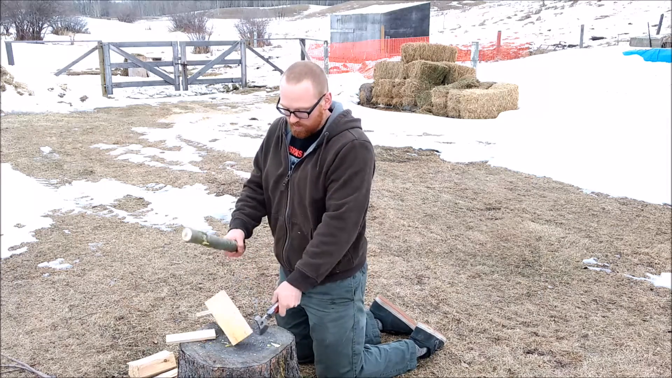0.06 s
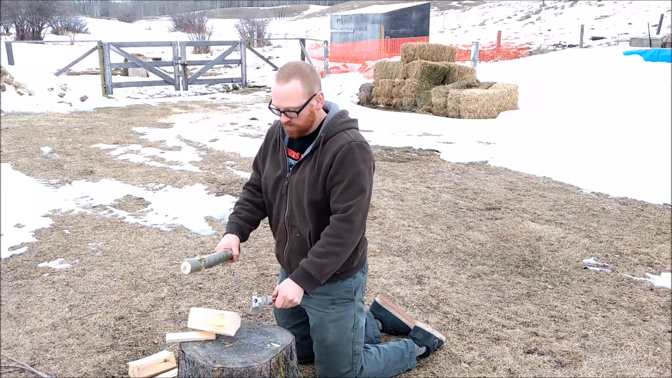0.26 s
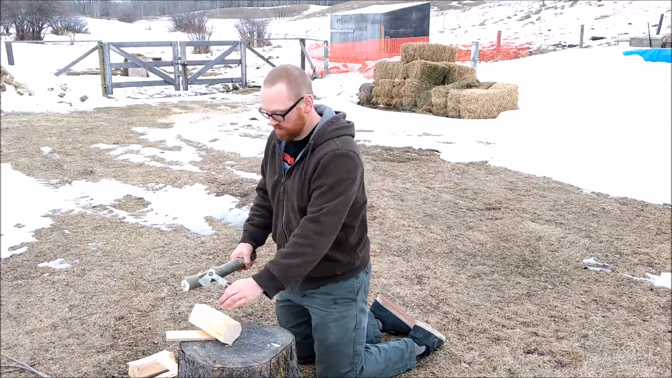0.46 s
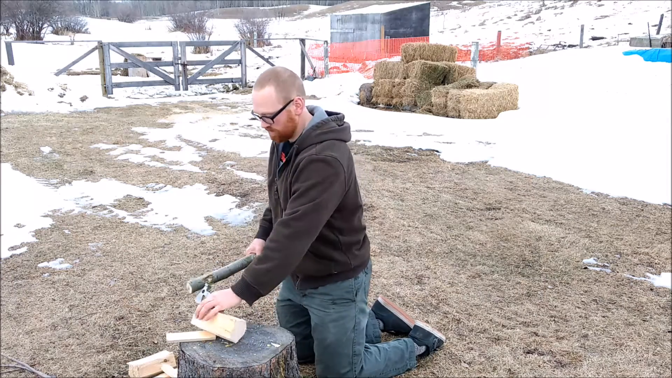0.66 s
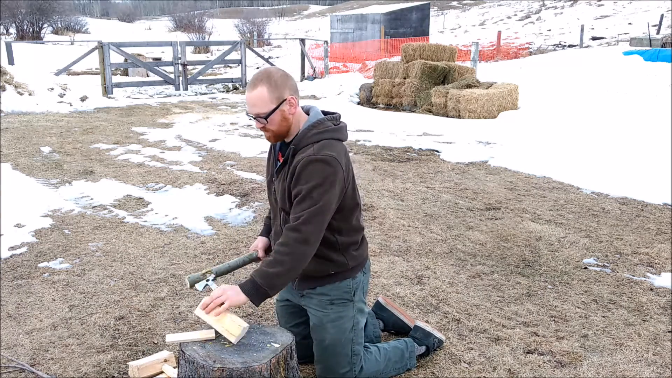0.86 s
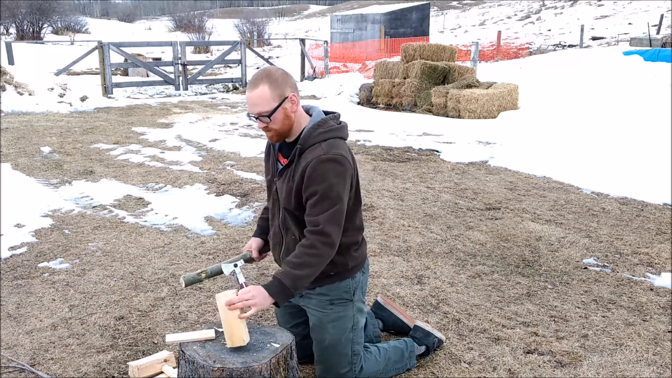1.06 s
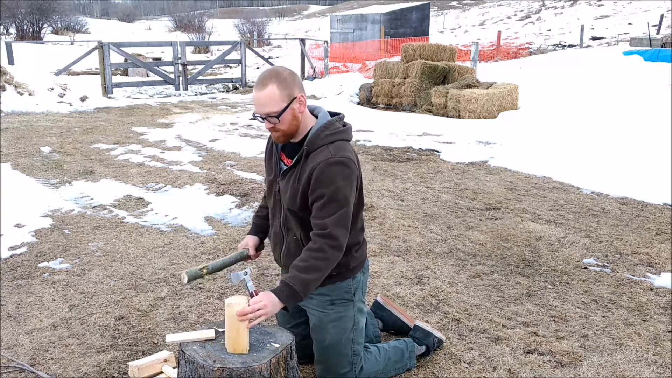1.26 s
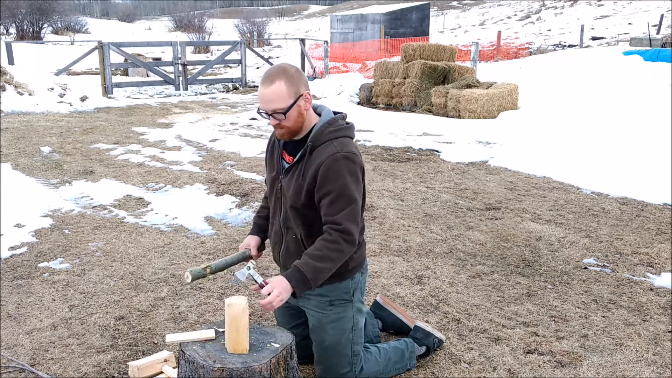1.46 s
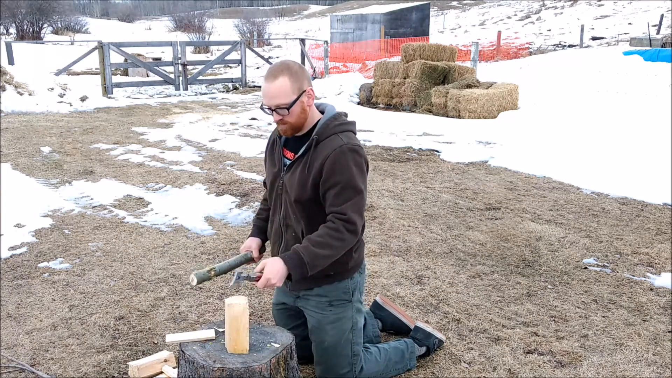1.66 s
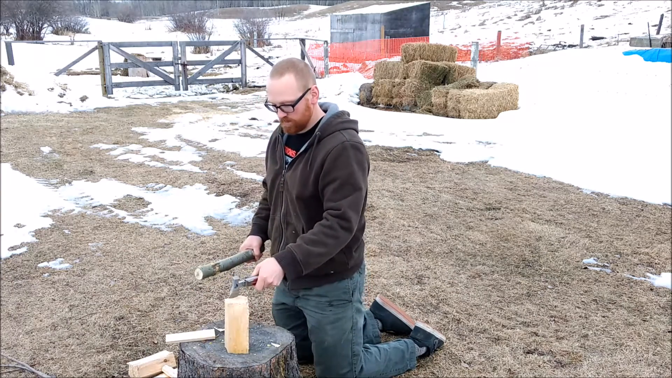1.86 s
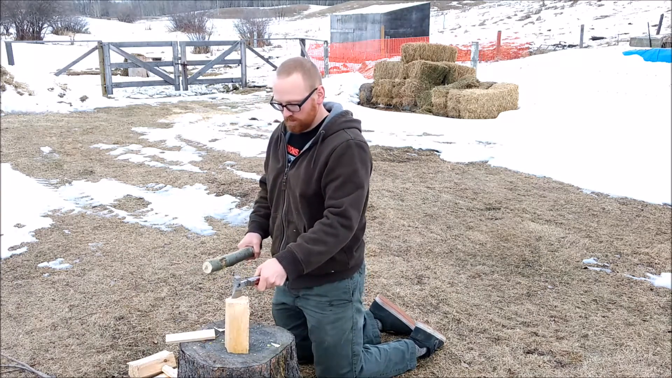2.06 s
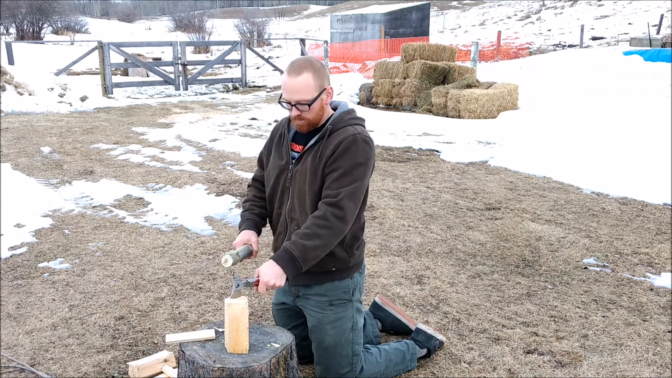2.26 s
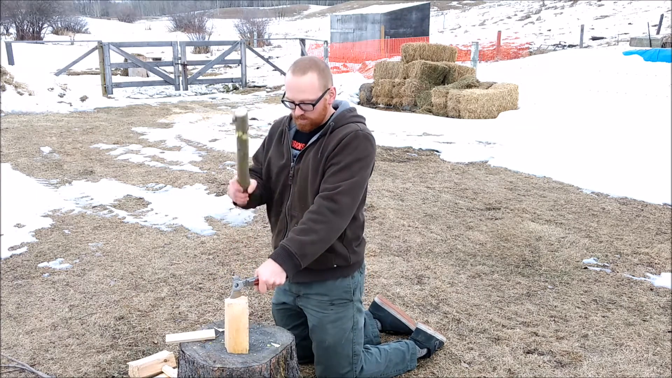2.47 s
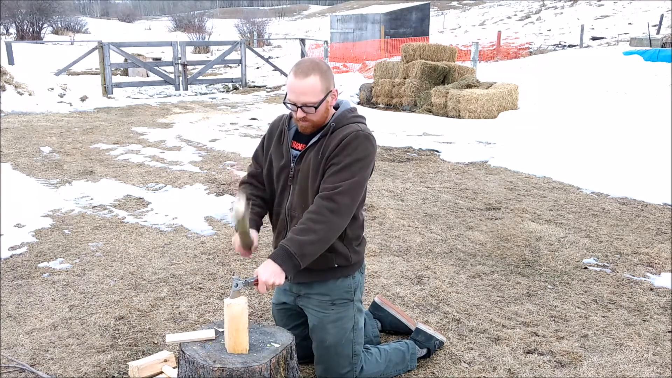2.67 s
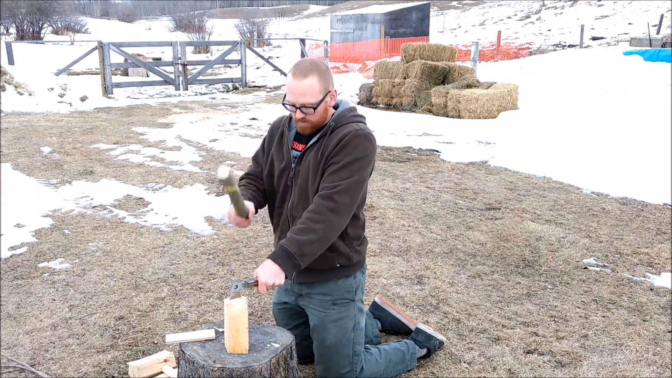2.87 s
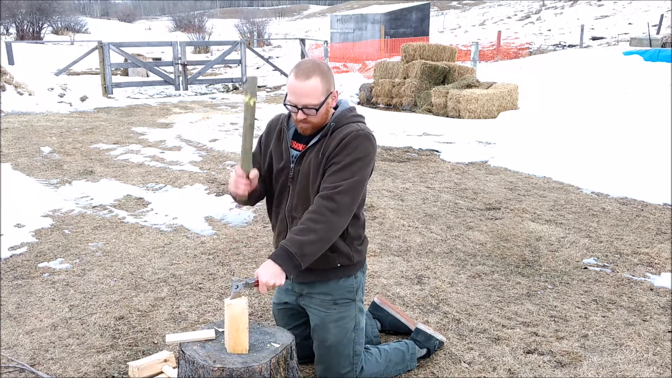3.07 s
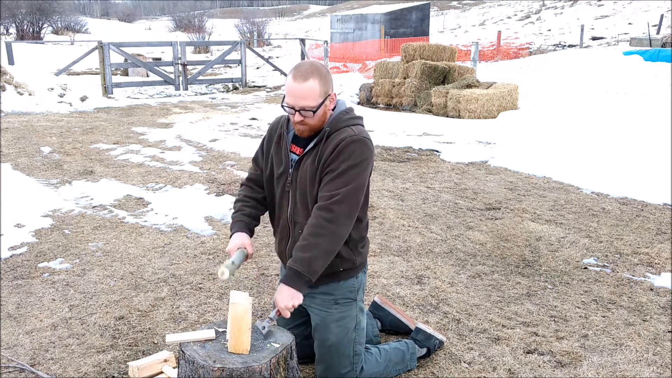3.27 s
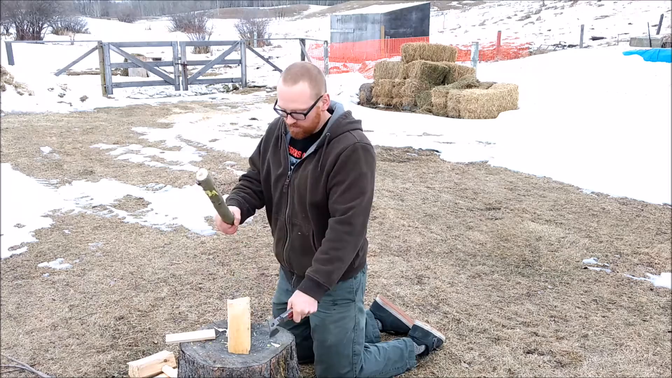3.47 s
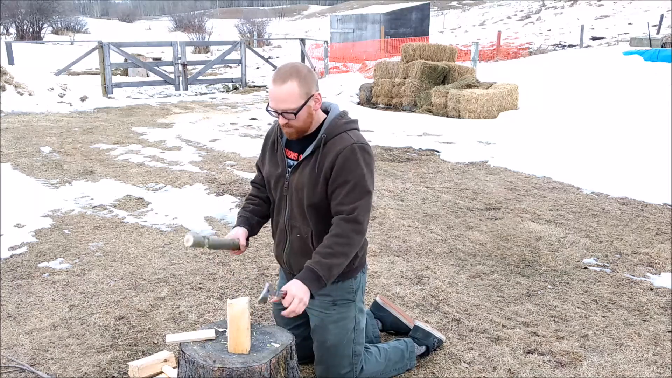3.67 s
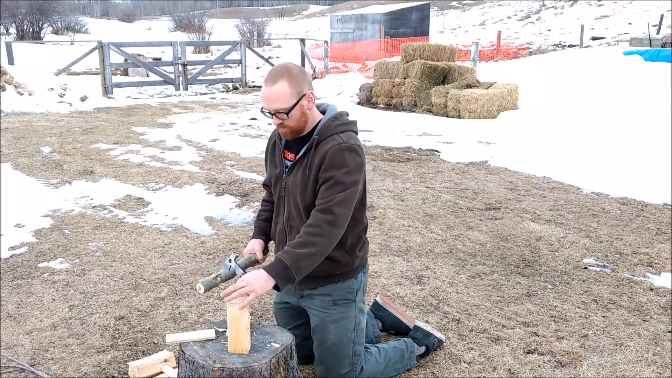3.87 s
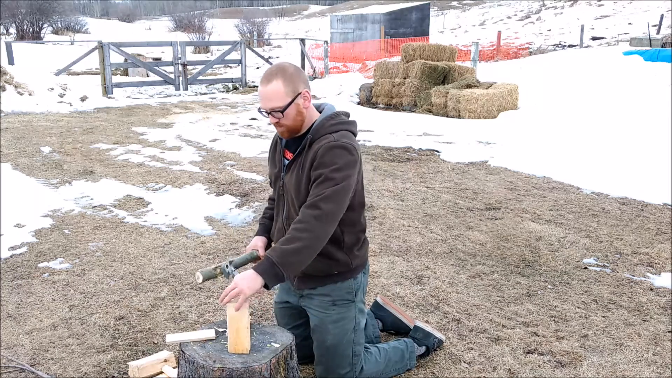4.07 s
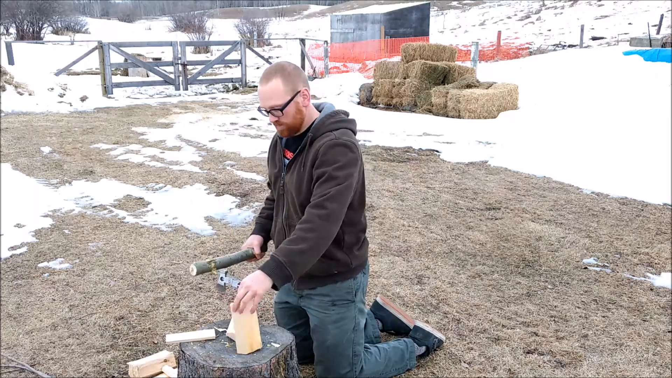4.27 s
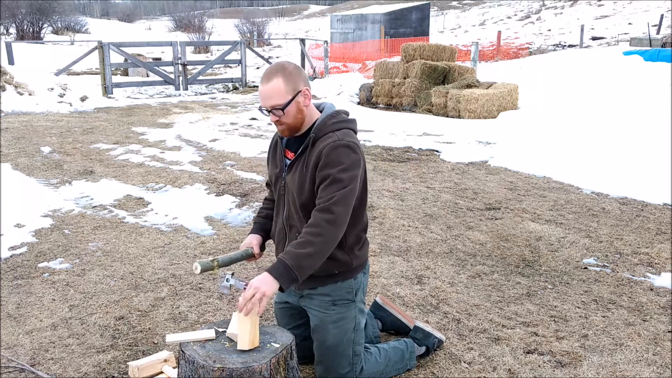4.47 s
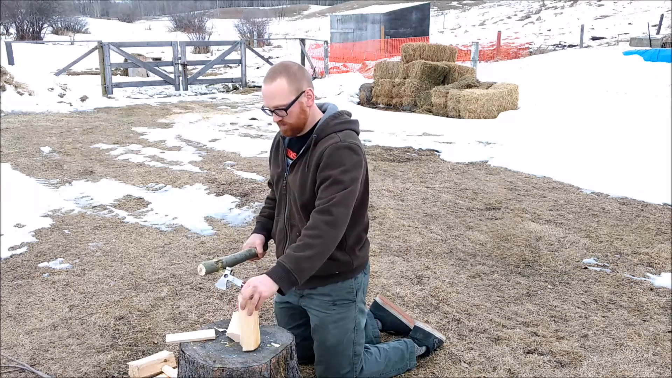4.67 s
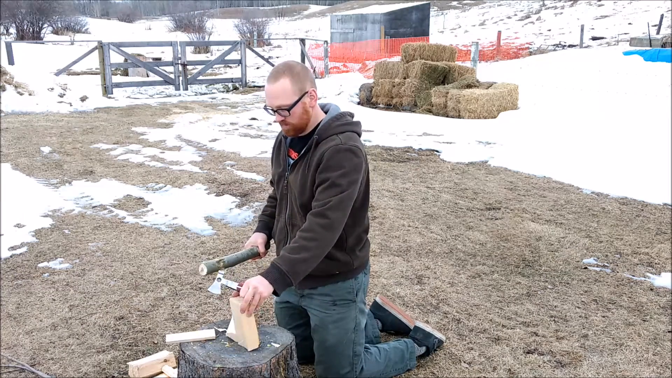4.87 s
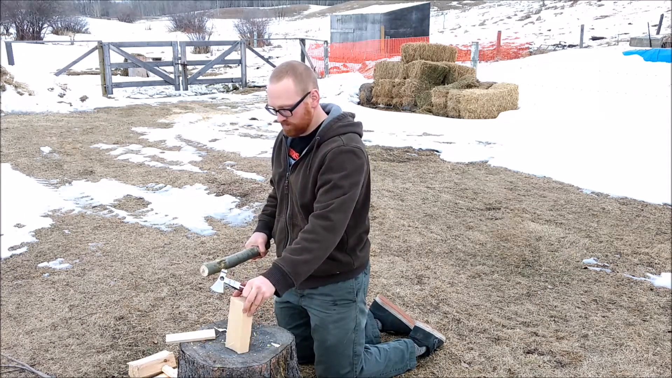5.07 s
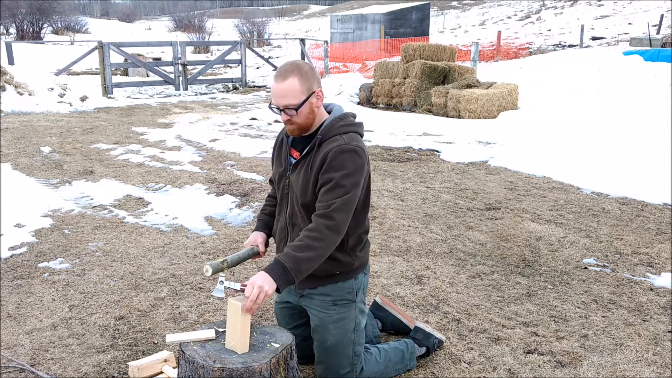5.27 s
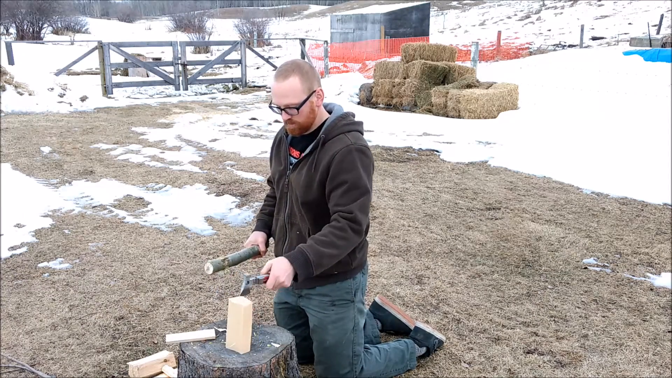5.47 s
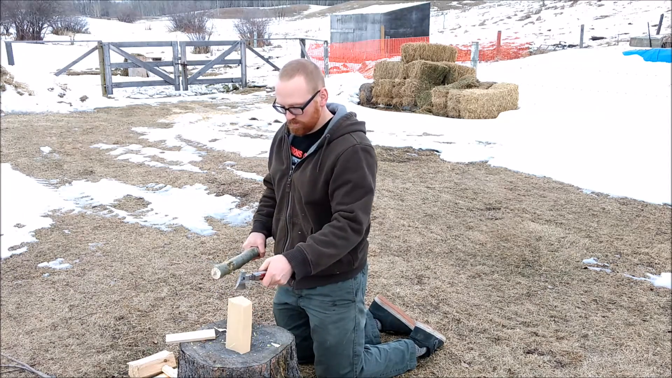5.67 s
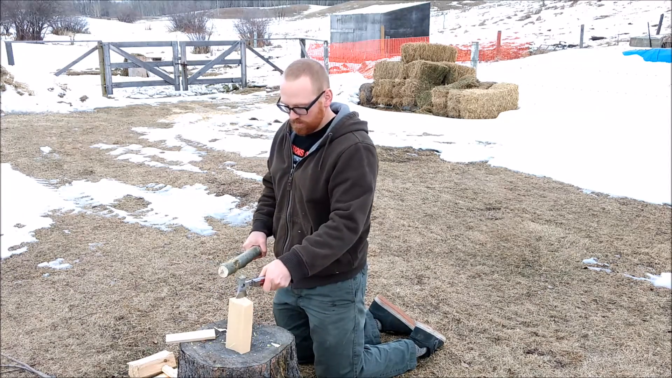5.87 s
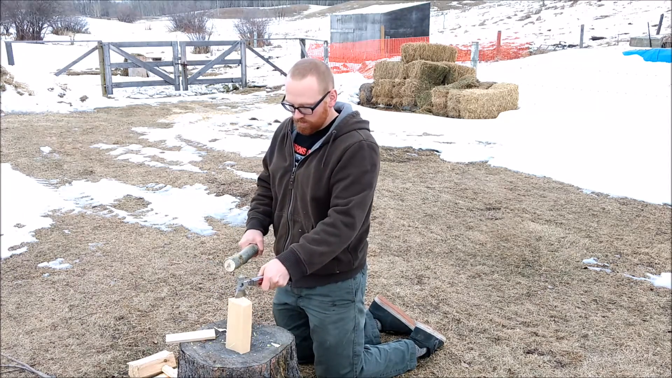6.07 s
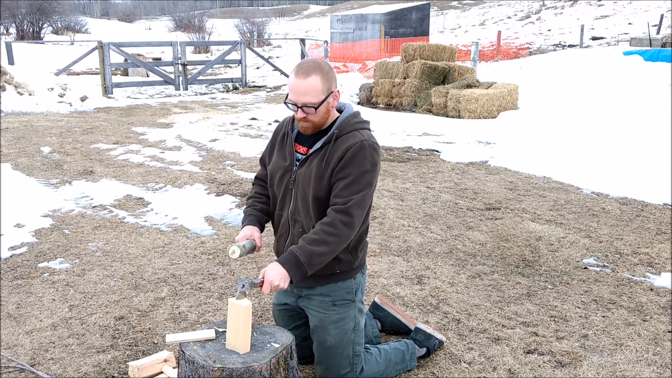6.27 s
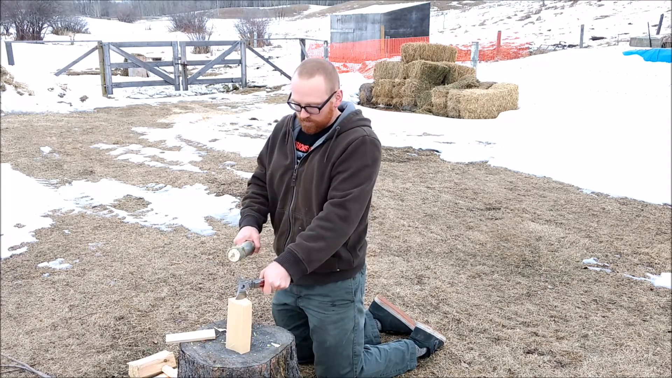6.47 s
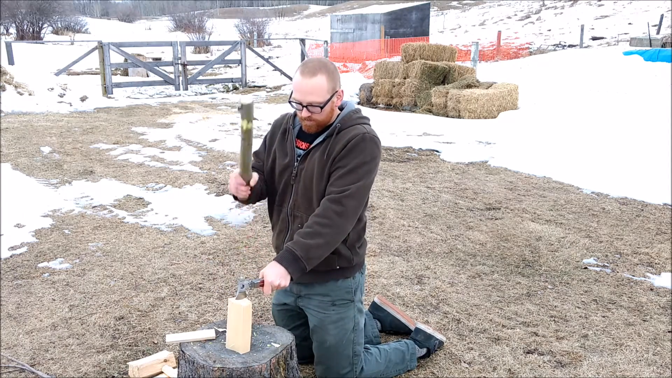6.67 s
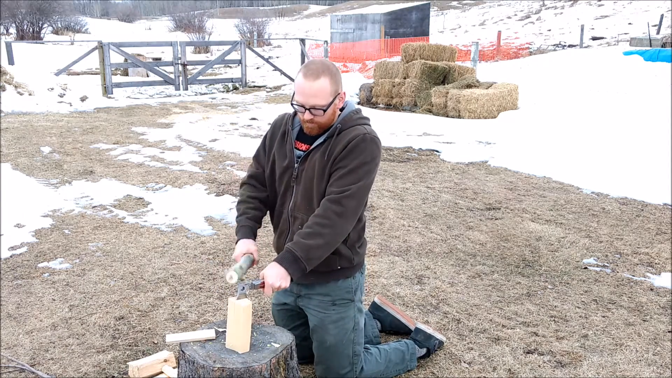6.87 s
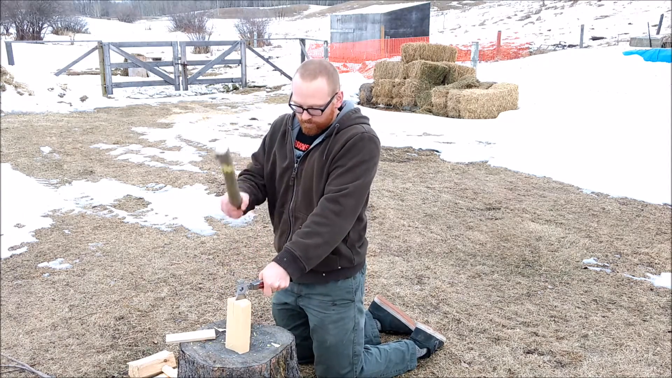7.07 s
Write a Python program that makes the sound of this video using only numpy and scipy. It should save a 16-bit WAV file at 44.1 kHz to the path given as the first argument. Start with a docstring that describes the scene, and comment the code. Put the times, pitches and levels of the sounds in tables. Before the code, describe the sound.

Close, dry wood splitting in open air: pieces are handled with small knocks and a brief metallic ring, then a stick hits a hatchet twice, hard and sharp, and the split halves clatter down. Quiet dull thuds into the stump and grainy rubbing follow before one more blunt whack at the end. Faint traffic and fine hiss lie beneath, ducked after each impact by automatic gain.

```python
"""An open, snowy farmyard: a wooden baton drives a small hatchet through firewood on a stump.
Three hard blows, the second splitting the log, are cracks of noise followed by damped resonances of wood and stump.
Around them wood and blade are set down with resonant knocks, ringing clinks, snapping fibres and grainy rustles.
Distant traffic, made of filtered noise, swells and ebbs; the camera's gain control ducks it after each blow."""
import sys
import numpy as np
from scipy import signal
from scipy.fft import rfft, irfft
from scipy.io import wavfile
from scipy.ndimage import uniform_filter1d

SR = 44100
rng = np.random.default_rng(int(sys.argv[2]) if len(sys.argv) > 2 else 0)


def materialize(psi):
    """Save the field psi as 16-bit PCM at rate SR to the path in sys.argv[1].

    A 1-D psi becomes a single channel; in a 2-D psi each row is a channel.
    """
    bounded = np.clip(np.atleast_2d(psi).T, -1, 1)
    quanta = np.round(bounded * 32767).astype(np.int16)
    wavfile.write(sys.argv[1], SR, quanta)


N = 313992
TAPS = 8192  # samples in one short sound

# The baton hits the back of the blade. Each row: time in seconds, level in dB, softness corner in Hz before the
# log's pitch factor, pitch of the struck piece in Hz, then dB relative to the log: that piece, the crack;
# and last the second push in dB relative to the first.
BLOWS = [(2.7351, 21, 1700, 1575, 7.5, -21.5, -7), (3.1876, 28, 3800, 1572, 1.5, -15, -21),
         (6.9078, 19, 2700, 1236, 7.5, -15.5, -35.5)]
BLOW_THUMP_DB, SECOND_PUSH_S = -8, 0.00146
# Resonances of the log with the blade in it. Each row: frequency in Hz and width in Hz, both before
# the log's pitch factor, level in dB before softening.
LOG_MODES = [(483, 150, -8), (632, 290, -7), (846, 84, -1), (1050, 690, -7), (2250, 380, -1.5),
             (2730, 73, -7.5), (2970, 40, -38.5), (3230, 100, -6.5), (4370, 67, -28), (6180, 180, -1)]
THUMP_HZ, THUMP_WIDTH_HZ, PIECE_WIDTH_HZ = 226, 86, 334
# Spectrum of snapping fibres. Each row: frequency in Hz, gain in dB.
CRACK_SPECTRUM = [(100, -42.5), (300, 0), (1000, 6), (2200, -2), (3200, -4), (4300, -3.5), (5300, -7.5),
                  (6200, 0), (7300, -9.5), (9500, -12.5), (12000, -11.5), (15500, -13.5)]
CRACK_LEAD_S, CRACK_T60_S, LIGHT_CRACK_T60_S = 0.001214, 0.026, 0.074
# Wood falls against wood or steel. Each row: time in seconds, level in dB, log pitch factor, softness corner in Hz
# before that factor, pitch of the struck piece in Hz, level of that piece in dB relative to the log.
CLATTER = [(0.2570, -12, 1, 3020, 1410, -1), (0.2621, -2.5, 1, 2500, 1560, -1),
           (0.3574, -4, 1, 1400, 595, -6), (0.5482, 5, 1.31, 1830, 760, 0),
           (0.5703, -6, 0.79, 2500, 1220, -13), (0.5772, -6.5, 1.14, 2000, 900, -21),
           (3.2071, 12, 1.1, 1700, 1330, -6.5), (3.2147, 19.5, 0.92, 2700, 1453, 14),
           (3.226, 12, 1, 1280, 810, -32)]
CLATTER_THUMP_DB, CLATTER_CRACK_DB = -34.5, -23
# Log and blade are set in place on the stump. Each row: time in seconds, level in dB, pitch of the struck piece in Hz,
# then dB relative to the log: that piece, the stump's thump.
PLACINGS = [(1.8125, -14.5, 645, -17, 4), (5.1117, -8.5, 570, 9, -2), (5.8379, 0, 1390, 4, 1.5),
            (6.0873, -17.5, 800, 5, -7), (6.2531, -8, 826, 7.5, 4)]
PLACING_SOFT_HZ, PLACING_CRACK_DB = 1010, -25
# A splinter snaps. Each row: time in seconds, level in dB before colouring.
SPLINTERS = [(3.575, -12.5), (4.533, -18)]
SPLINTER_T60_S = 0.03  # before colouring
# Colour of a splinter. Each row: frequency in Hz, gain in dB.
SPLINTER_SPECTRUM = [(150, -20.5), (1000, 5), (2600, -4.5), (4200, 1), (6000, -3.5), (9000, -10),
                     (15000, -7)]
# A loose billet lands or is nudged. Each row: time in seconds, level in dB, softness corner in Hz,
# level in dB of the crunch of its rough end.
DROPS = [(0.018, 16.5, 980, -6.5), (3.3252, 7.5, 1500, -17.5), (3.406, 26, 2900, -9.5),
         (3.5362, 8, 890, -34.5), (3.5925, 3.5, 1000, -29)]
# The loose billet rings longer than the held log. Each row: frequency in Hz, width in Hz, level in dB before softening.
BILLET_MODES = [(175, 31, -24.5), (654, 133, -7), (848, 75, 2.5), (1216, 260, -18.5), (1580, 380, -5.5),
                (1870, 310, -8), (2260, 114, -4.5), (2630, 61, -38), (3530, 200, -1), (4100, 170, -18)]
# The bare blade touches wood. Each row: time in seconds, level in dB.
CLINKS = [(0.022, -36), (0.358, -53), (0.5467, -27)]
# Ring of the bare blade. Each row: frequency in Hz, relative level in dB, free 60 dB decay in seconds.
STEEL_MODES = [(2675, -2.5, 0.12), (4220, -38, 0.035), (5870, -17, 0.029)]
# Sleeves, bark and blade rub. Each row: start in seconds, length in seconds, level in dB at the peak of the swell.
RUSTLES = [(1.77, 0.091, -65), (4.12, 0.066, -63), (5.198, 0.081, -67.5), (5.359, 0.03, -65.5)]
# Colour of the rubbing. Each row: frequency in Hz, gain in dB.
RUSTLE_SPECTRUM = [(300, -9), (1000, 4), (2600, 14), (3400, -18), (4200, 22), (5000, -28), (6000, 8),
                   (15000, -22)]
# Echoes from sheds and bales. Each row: delay in seconds, level in dB before thinning.
ECHOES = [(0.0409, -31), (0.09, -44)]
FAR_T60_S = 0.2  # before thinning
# What comes back from afar is thin. Each row: frequency in Hz, gain in dB.
FAR_SPECTRUM = [(200, 0), (1200, -28.5), (2500, 1.5), (6000, 4), (15000, 0.5)]
# Traffic swells and ebbs. Each row: time in seconds, tyre roar in dB before the waver.
TRAFFIC = [(0, -58), (1.1, -61), (2.65, -55.5), (4.1, -59), (5.5, -56.5), (6.25, -52), (6.6, -56),
           (7.12, -59.5)]
RUMBLE_START_DB, RUMBLE_DB_PER_S, HISS_DB, SELF_NOISE_DB = -59.5, -0.74, -66.5, -71.5
# Spectra of the far rumble, tyre roar and fine hiss. Each row: frequency in Hz, relative density in dB per Hz.
RUMBLE_SPECTRUM = [(20, -41.5), (45, -34.5), (75, -8.5), (105, -4), (140, 1), (180, -5), (260, -9),
                   (400, -6.5), (800, -37)]
ROAR_SPECTRUM = [(200, -26), (380, -8.5), (520, 1.5), (730, 4), (900, 0.5), (1050, -6.5), (1200, -12),
                 (1380, -16.5), (1560, -26), (2000, -19), (4000, -39)]
HISS_SPECTRUM = [(200, 2), (1500, 3), (2500, 0.5), (4300, 0.5), (7000, -3.5), (10000, -6.5), (15500, -9.5)]
# Far engines drone. Each row: start and end of full level in seconds, pitch in Hz, width in Hz, dB before the waver.
DRONES = [(0, 1.87, 178, 14, -66), (1.9, 3.5, 120, 30, -69), (5, 6.3, 114, 24, -65),
          (4, 6.7, 529, 7.3, -64.5)]
DRONE_FADE_S = 0.46  # fades lie outside the start and end
# Level tilt of the microphone pair. Each row: frequency in Hz, left minus right in dB.
TILT = [(40, 3.5), (130, 6), (200, 5.5), (300, 2), (420, 4.5), (750, 6.5), (1000, 0), (1300, 0.5),
        (1520, -9), (1800, -4.5), (2200, 0.5), (16000, -0.5)]
# Likeness of background noise at the two ports. Each row: frequency in Hz, likeness from 0 to 1.
LIKENESS = [(100, 0.1), (330, 0.12), (520, 0.85), (1100, 0.97), (1500, 0.23), (2100, 1), (15000, 0.84)]
# Phase lag of the microphone pair. Each row: frequency in Hz, radians by which left lags.
LAG = [(0, 0), (330, .7), (560, .25), (1200, .7), (1450, 1.7), (1600, 3.1), (2100, 4.3), (2700, 5.5),
       (3560, 9.42), (16000, 53.3)]
# Gain control: a slow stage, and a quick one for the hardest blows. Each row: threshold in dB,
# share of the excess removed, recovery of the held level in dB per second.
GAIN_STAGES = [(-32.5, 0.63, 13), (-14.5, 0.83, 22.5)]
HELD_DB = -11.5  # the work is already under way, so the gain starts out turned down
EDGE_HZ = 15900  # upper band limit


def blows():
    """Fibres snap first; then the baton's push reaches log and stump, and comes again as the blade jams in the wood."""
    out = np.zeros(N)
    for s, db, soft_hz, piece_hz, piece_db, crack_db, second_db in BLOWS:
        push = amp(db) * knock(0.96, soft_hz, piece_hz, piece_db, BLOW_THUMP_DB)
        add(out, s - CRACK_LEAD_S, amp(db + crack_db) * crack(CRACK_T60_S))
        add(out, s, push)
        add(out, s + SECOND_PUSH_S, amp(second_db) * push)
    return out


def knock(pitch, soft_hz, piece_hz, piece_db, thump_db, low_cut_hz=152):
    """A push rings the log, the struck piece and the stump, all quickly damped."""
    f = np.fft.rfftfreq(TAPS, 1 / SR)
    radiated = 1 - 0.95 / (1 + (f / low_cut_hz) ** 6)  # small things radiate little bass
    log = struck(LOG_MODES, soft_hz, f / pitch)
    piece = amp(piece_db) * hump(f, piece_hz, PIECE_WIDTH_HZ)
    stump = amp(thump_db) * hump(f, THUMP_HZ, THUMP_WIDTH_HZ)
    return causal((log + piece + stump) * radiated)


def struck(modes, soft_hz, f):
    """Gain of a struck body: a longer, softer contact leaves its high modes at rest."""
    ring = sum(amp(db) * hump(f, hz, width) for hz, width, db in modes)
    return ring / np.sqrt(1 + (f / soft_hz) ** 4)


def crack(t60, grain_db=3.5, rise=0.00084):
    """A quick volley of snapping fibres: a grainy burst through the colour of the wood."""
    f = np.fft.rfftfreq(TAPS, 1 / SR)
    snap = causal(amp(read(CRACK_SPECTRUM, f)))
    return signal.fftconvolve(burst(t60, grain_db, rise=rise), snap)


def clatter():
    """Loose wood meets in bright, glancing knocks that hardly move the stump."""
    out = np.zeros(N)
    for s, db, pitch, soft_hz, piece_hz, piece_db in CLATTER:
        add(out, s - CRACK_LEAD_S, amp(db + CLATTER_CRACK_DB) * crack(LIGHT_CRACK_T60_S))
        add(out, s, amp(db) * knock(pitch, soft_hz, piece_hz, piece_db, CLATTER_THUMP_DB))
    return out


def placings():
    """Guided by hand, log and blade land softly: dull knocks that carry into the stump."""
    out = np.zeros(N)
    for s, db, piece_hz, piece_db, thump_db in PLACINGS:
        add(out, s - CRACK_LEAD_S, amp(db + PLACING_CRACK_DB) * crack(LIGHT_CRACK_T60_S))
        add(out, s, amp(db) * knock(0.94, PLACING_SOFT_HZ, piece_hz, piece_db, thump_db))
    return out


def splinters(grain_db=2.0):
    """A few fibres snap, thin and bright, without ringing the log."""
    out = np.zeros(N)
    for s, db in SPLINTERS:
        add(out, s, amp(db) * burst(SPLINTER_T60_S, grain_db))
    return colour(out, SPLINTER_SPECTRUM)


def drops(crunch_t60=0.039):
    """A loose billet answers each touch with a pitched, woody tock and a crunch of fibres."""
    out, f = np.zeros(N), np.fft.rfftfreq(TAPS, 1 / SR)
    for s, db, soft_hz, crunch_db in DROPS:
        add(out, s, amp(db) * causal(struck(BILLET_MODES, soft_hz, f)))
        add(out, s, amp(crunch_db) * crack(crunch_t60))
    return out


def clinks(grip_s=0.055):
    """Free of the log, the steel blade rings on until the fingers close on it."""
    out, t = np.zeros(N), np.arange(TAPS) / SR
    ring = sum(amp(db - 60 * t / t60) * np.sin(2 * np.pi * hz * t) for hz, db, t60 in STEEL_MODES)
    damping = np.exp(-(t / grip_s) ** 2)
    for s, db in CLINKS:
        add(out, s, amp(db) * ring * damping)
    return out


def rustles(grain_db=6):
    """Each movement of the hands sheds a small cloud of grains."""
    swells = np.zeros(N)
    for s, length, db in RUSTLES:
        add(swells, s, amp(db) * np.hanning(int(length * SR)))
    grains = rng.standard_normal(N) * amp(grain_db * rng.standard_normal(N))
    return swells * unit(colour(grains, RUSTLE_SPECTRUM))


def yard(x, ground_db=-19, ground_t60=0.032, far_db=-30, echo_t60=0.036):
    """Open air: scatter off the ground, a few faint echoes and a thin tail."""
    near, far = np.zeros((2, SR // 2))
    near[0] = 1  # direct sound
    add(near, 0.0025, amp(ground_db) * burst(ground_t60, 0.88))
    add(far, 0.015, amp(far_db) * burst(FAR_T60_S, 2.3, size=SR // 2))
    for delay, db in ECHOES:
        add(far, delay, amp(db) * burst(echo_t60, 1))
    return signal.fftconvolve(x, near + colour(far, FAR_SPECTRUM))[:N]


def background(waver_db=0.95):
    """Distant traffic under a steady fine hiss: a receding rumble, swelling tyre roar and engines that come and go."""
    t, f = np.arange(N) / SR, np.fft.rfftfreq(N, 1 / SR)
    rumble = amp(RUMBLE_START_DB + RUMBLE_DB_PER_S * t) * noise(amp(read(RUMBLE_SPECTRUM, f)))
    roar = amp(np.interp(t, *np.transpose(TRAFFIC))) * noise(amp(read(ROAR_SPECTRUM, f)))
    hiss = amp(HISS_DB) * noise(amp(read(HISS_SPECTRUM, f)))
    drones = np.zeros((2, N))
    for start, end, hz, width, db in DRONES:
        fade = np.clip(1 + np.minimum(t - start, end - t) / DRONE_FADE_S, 0, 1)
        drones += amp(db) * fade * noise(hump(f, hz, width))
    waver = unit(irfft(rfft(rng.standard_normal(N)) * hump(f, 0, 18), N))  # moving air bends far sound
    return rumble + hiss + (roar + drones) * amp(waver_db * waver)


def noise(gain):
    """A pair of noises of rms 1 with this spectrum, only partly alike at the two ports."""
    same = np.clip(read(LIKENESS, np.fft.rfftfreq(N, 1 / SR)), 0, 1)
    a, b = rfft(rng.standard_normal((2, N)))
    partner = same * a + np.sqrt(1 - same ** 2) * b
    return unit(irfft(np.array([a, partner]) * gain, N))


def ports(x):
    """The two microphone ports differ in level and delay, with their total power kept even."""
    f = np.fft.rfftfreq(N, 1 / SR)
    ratio = amp(read(TILT, f))
    lag = np.exp(-1j * np.interp(f, *np.transpose(LAG)))
    pair = np.array([ratio * lag, np.ones(len(f))]) * np.sqrt(2 / (1 + ratio ** 2))
    return irfft(rfft(x) * pair, N)


def amp(db):
    """Decibels to gain."""
    return 10 ** (np.asarray(db) / 20)


def unit(x):
    """Scales to rms 1."""
    return x / np.sqrt(np.mean(x ** 2) + 1e-20)


def read(points, hz):
    """Reads a table on a log-frequency axis."""
    f, value = np.transpose(points)
    return np.interp(np.log(hz + 1), np.log(f + 1), value)


def add(mix, s, sound):
    """Adds a sound into the mix at time s in seconds."""
    part = mix[max(round(s * SR), 0):][:len(sound)]
    part += sound[:len(part)]


def colour(x, spectrum):
    """Filters x by a table of frequency and dB."""
    gain = amp(read(spectrum, np.fft.rfftfreq(len(x), 1 / SR)))
    return irfft(rfft(x) * gain, len(x))


def hump(f, hz, width):
    """Gain of a resonance with steep skirts, half as high at the edges of its width."""
    return 1 / (1 + (2 * (f - hz) / width) ** 2)


def causal(gain):
    """The most compact impulse response that has this gain (minimum phase)."""
    log_gain = np.log(np.maximum(np.r_[gain, gain[-2:0:-1]], 1e-5))
    return np.fft.ifft(np.exp(signal.hilbert(log_gain).conj())).real


def burst(t60, grain_db, rise=0.00088, size=TAPS):
    """Grainy noise of energy 1 that rises quickly and dies."""
    t = np.arange(size) / SR
    grains = rng.standard_normal(size) * amp(grain_db * rng.standard_normal(size))
    x = grains * amp(-60 * t / t60) * (1 - np.exp(-t / rise))
    return x / np.linalg.norm(x)


def scene():
    """Work at the stump and the far background, heard through two microphone ports."""
    near = yard(blows() + clatter() + placings() + splinters() + drops() + clinks() + rustles())
    return ports(near + background())


def record(dry, attack_s=0.055):
    """Gain control lets each blow through, ducks after it and recovers slowly; a faint hiss stays; then the band limit."""
    power = uniform_filter1d((dry ** 2).mean(0), size=440)
    power_db = 10 * np.log10(abs(power) + 1e-12)
    duck_db = np.zeros(N)
    for threshold_db, squeeze, recovery_db_per_s in GAIN_STAGES:
        fall = np.arange(N) / SR * recovery_db_per_s
        # peaks are held, then sink at the recovery rate
        held_db = np.maximum(np.maximum.accumulate(power_db + fall), HELD_DB) - fall
        duck_db += squeeze * np.maximum(held_db - threshold_db, 0)
    r = np.exp(-1 / (attack_s * SR))
    smooth_db = signal.lfilter([1 - r], [1, -r], duck_db, zi=r * duck_db[:1])[0]
    ducked = dry / amp(smooth_db)
    hiss_gain = amp(read(HISS_SPECTRUM, np.fft.rfftfreq(N, 1 / SR)))
    hiss = amp(SELF_NOISE_DB) * ports(noise(hiss_gain))
    band_limit = signal.firwin(255, EDGE_HZ, window=("kaiser", 9), fs=SR)
    return signal.oaconvolve(ducked + hiss, band_limit[None], "same")


dry = scene()
out = record(dry)
materialize(out)
```